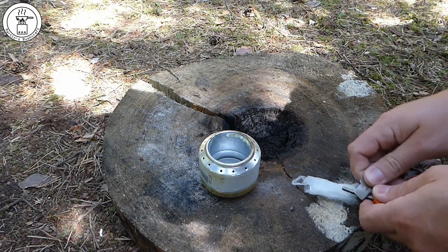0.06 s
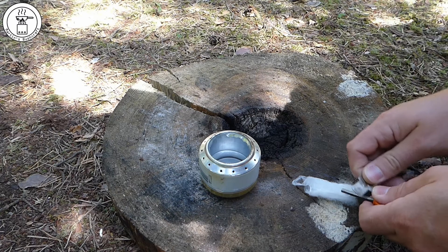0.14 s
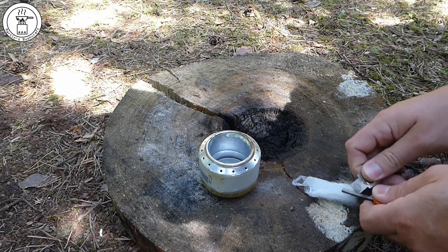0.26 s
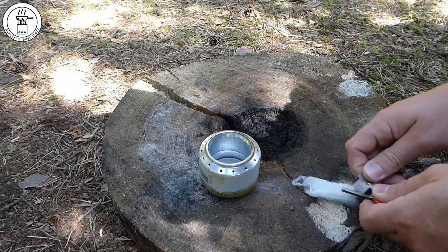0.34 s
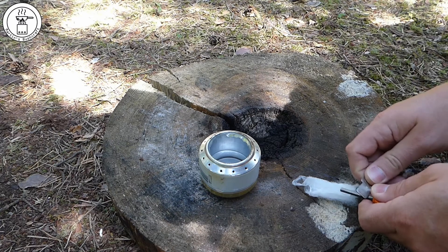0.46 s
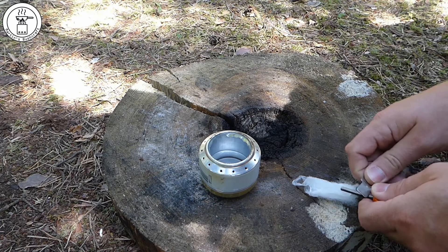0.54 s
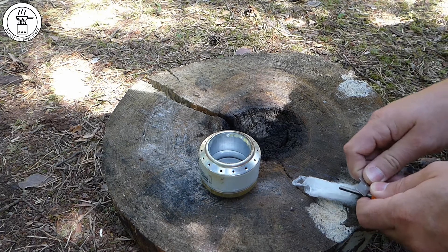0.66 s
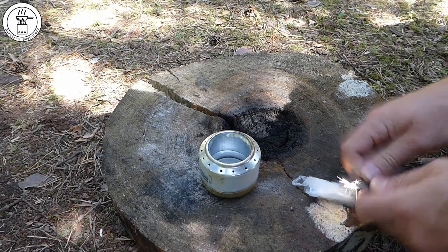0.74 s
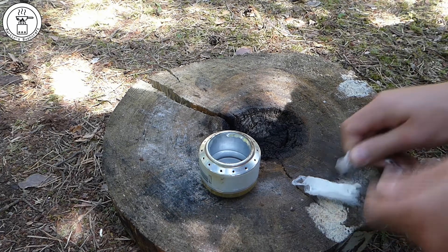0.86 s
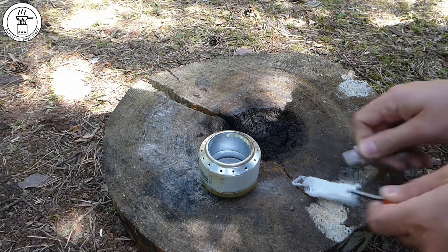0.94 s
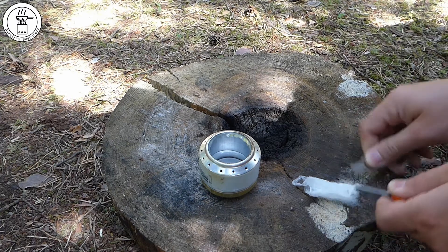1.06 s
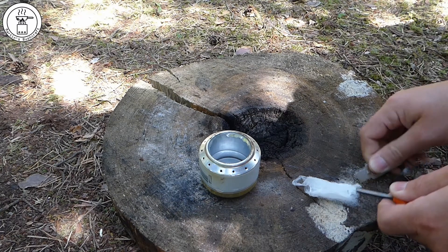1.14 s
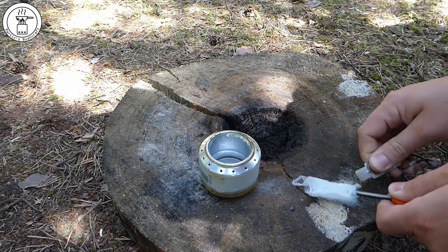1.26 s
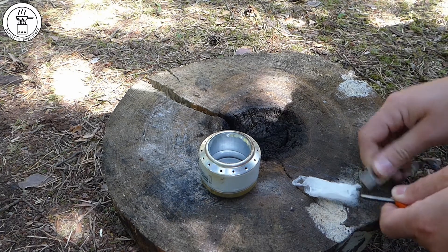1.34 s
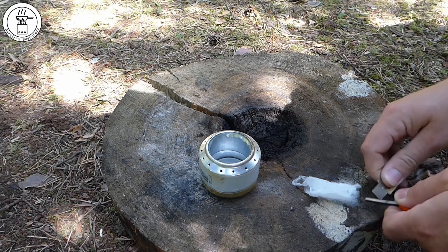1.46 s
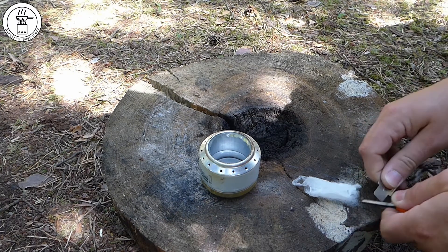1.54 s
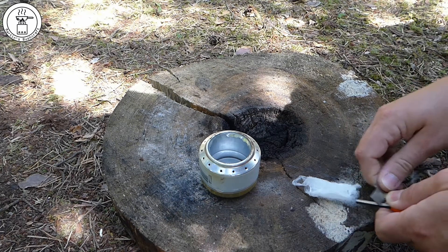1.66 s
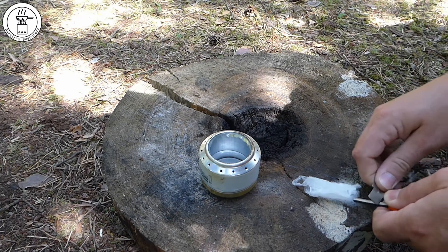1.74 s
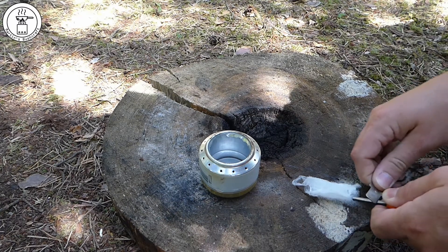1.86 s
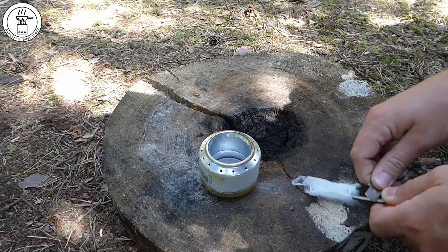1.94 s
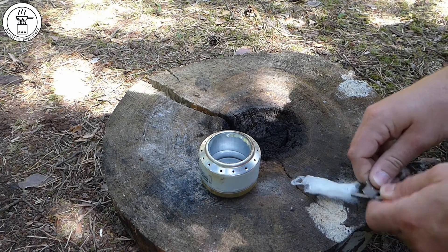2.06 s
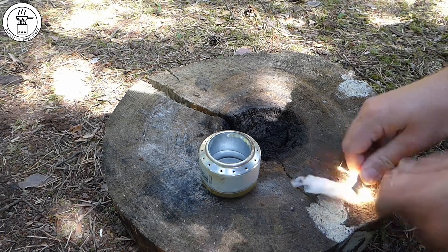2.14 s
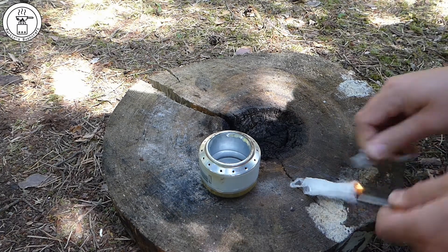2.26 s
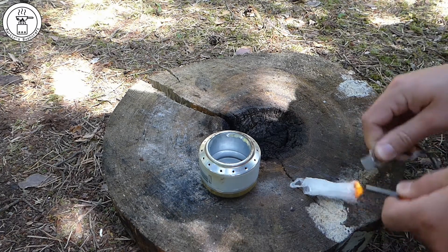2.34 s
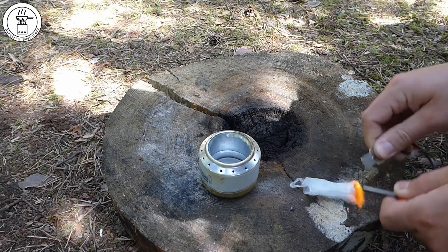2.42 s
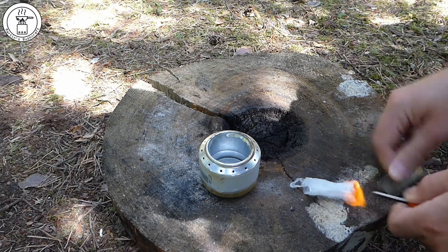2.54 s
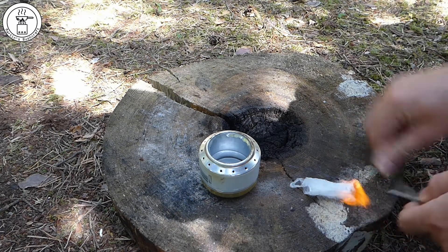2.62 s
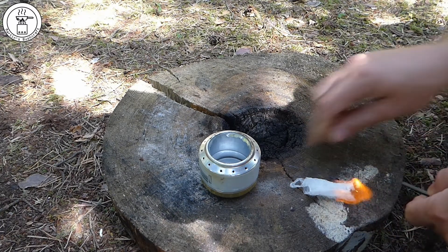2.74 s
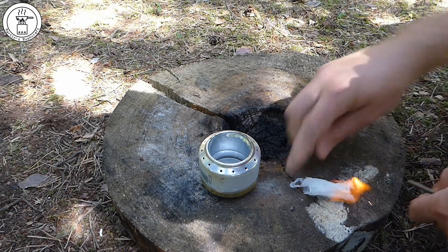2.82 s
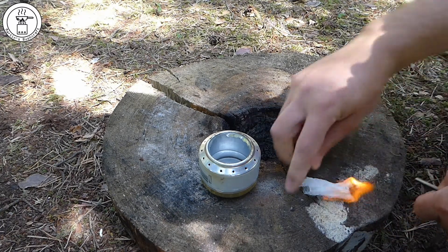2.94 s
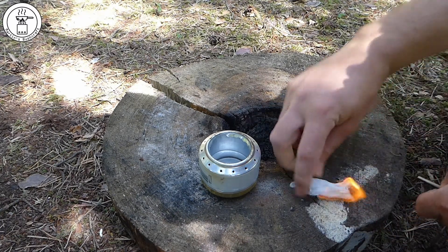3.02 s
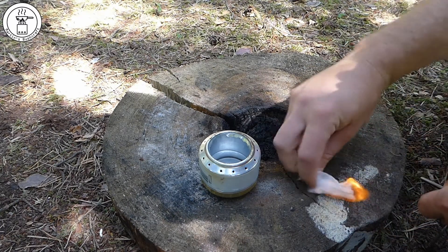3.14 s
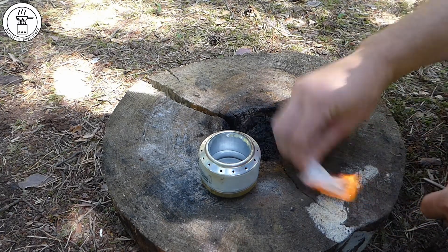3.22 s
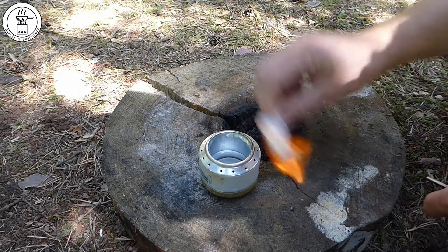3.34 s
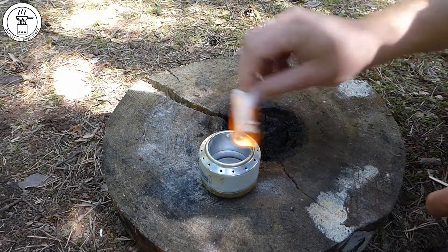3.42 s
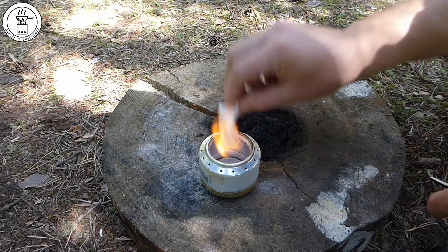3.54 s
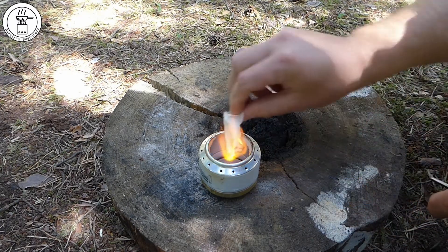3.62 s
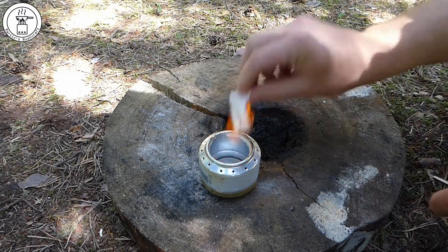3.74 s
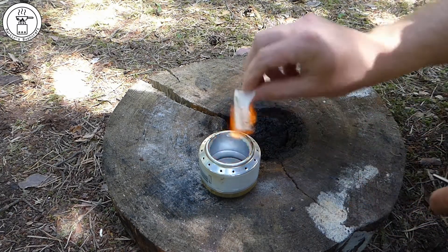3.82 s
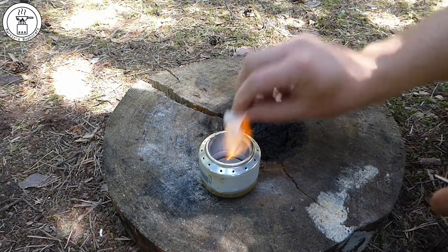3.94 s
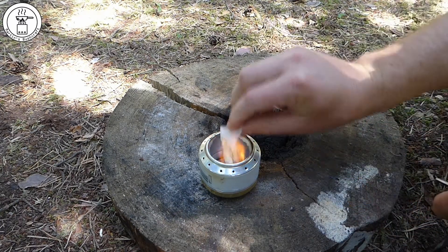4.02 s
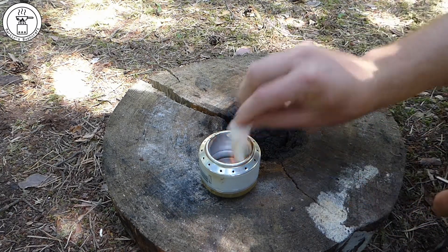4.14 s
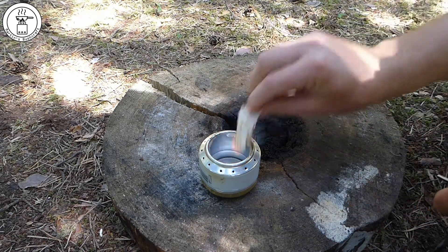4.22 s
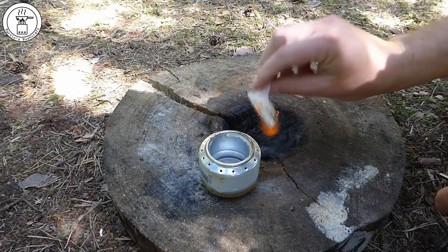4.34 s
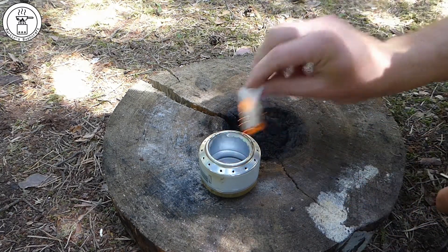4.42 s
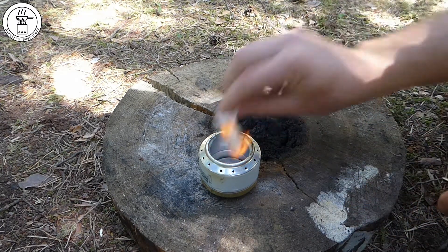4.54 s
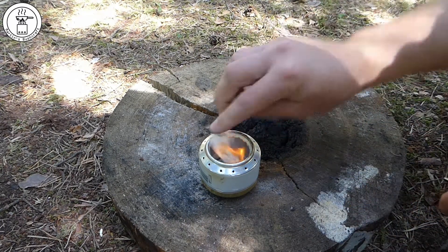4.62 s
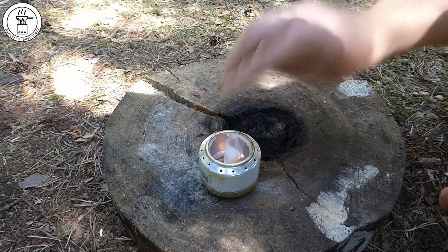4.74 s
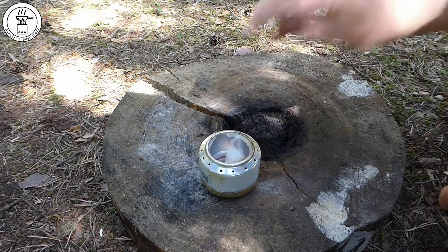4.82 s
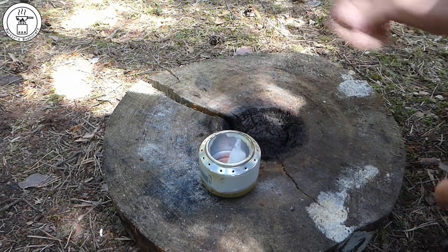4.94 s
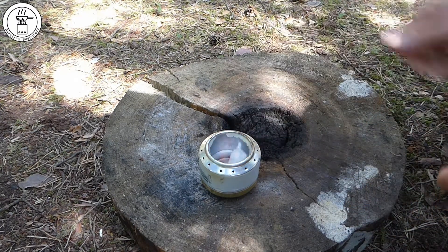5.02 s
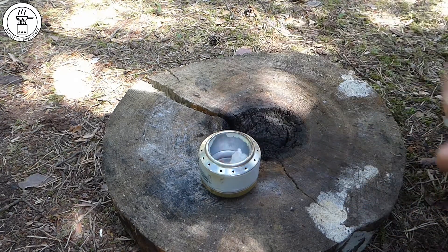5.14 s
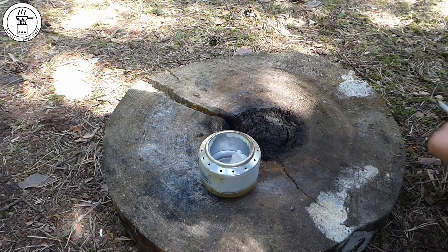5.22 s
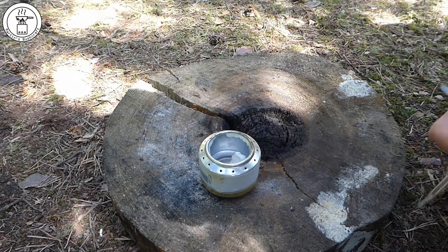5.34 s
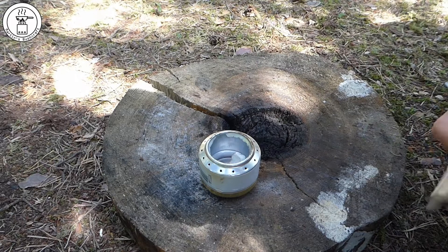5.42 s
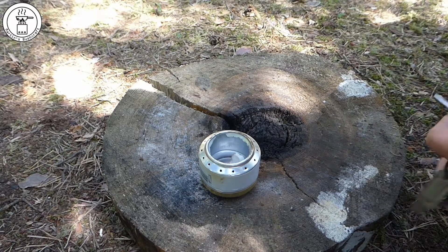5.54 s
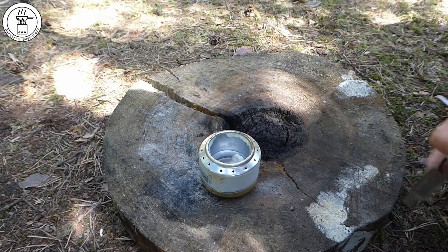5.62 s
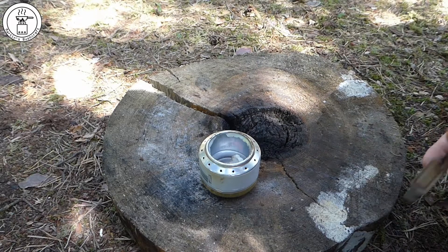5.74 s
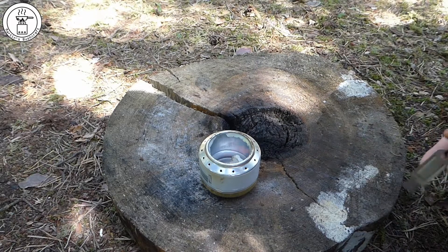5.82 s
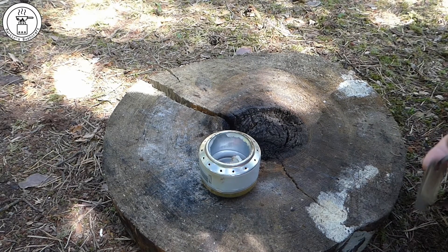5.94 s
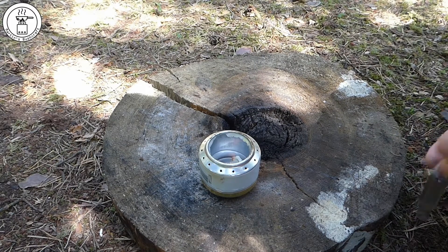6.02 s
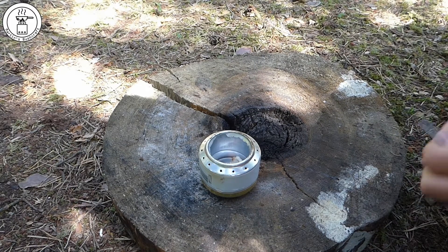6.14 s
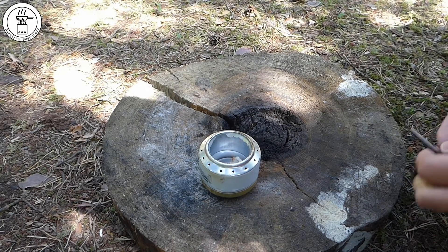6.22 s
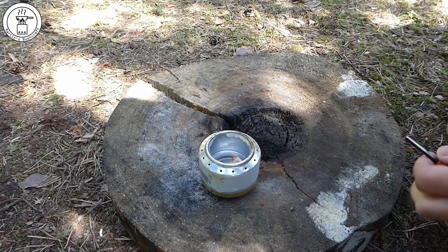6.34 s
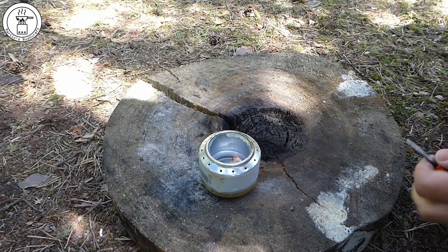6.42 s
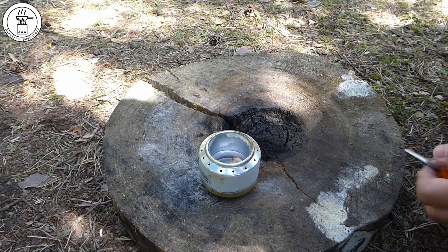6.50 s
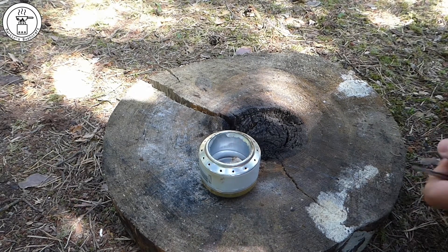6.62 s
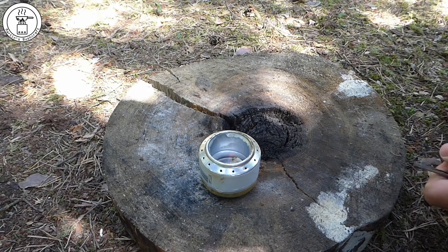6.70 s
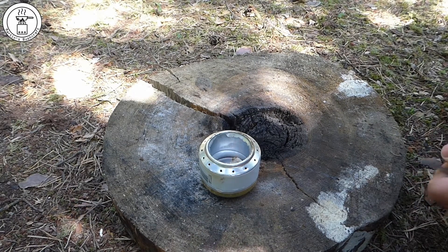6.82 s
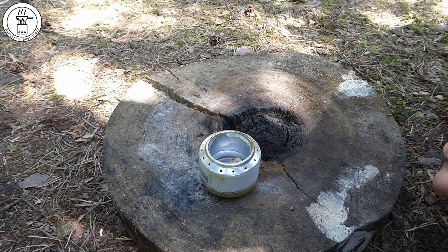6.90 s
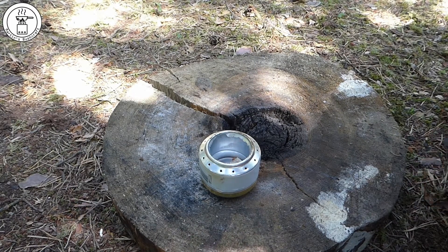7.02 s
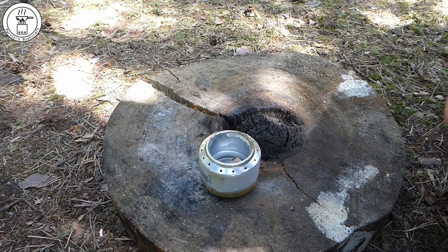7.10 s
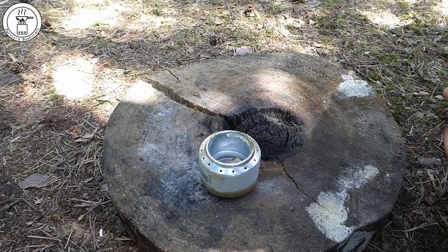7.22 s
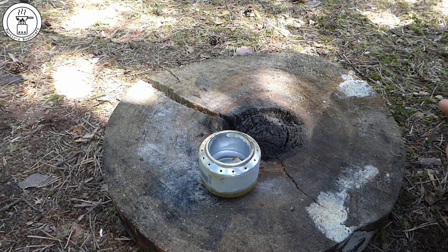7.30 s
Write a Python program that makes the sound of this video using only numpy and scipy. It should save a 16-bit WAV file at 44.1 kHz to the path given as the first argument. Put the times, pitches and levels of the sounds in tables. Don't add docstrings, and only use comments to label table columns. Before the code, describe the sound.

Quiet stereo ambience of far traffic rumble and smooth leaf-like hiss. Near the microphone, two abrupt scratchy metal strikes come over a second apart, the first much the sharper, followed by a dull knock and a brighter ringing chink. Hands rustle softly; then a muffled thump in a can starts a bright boiling hiss with tiny spitting clicks, narrowing and fading. Late on, a fingernail ticks rapidly over ribs, with one faint high bird call.

```python
import sys
import numpy as np
from scipy import signal
from scipy.fft import rfft, irfft, next_fast_len
from scipy.io import wavfile
from scipy.ndimage import map_coordinates

SR = 44100
rng = np.random.default_rng(int(sys.argv[2]) if len(sys.argv) > 2 else 0)


def put_to_file(sound):
    columns = np.atleast_2d(sound).T
    safe = np.clip(columns, -1, 1)
    whole_steps = np.round(safe * 32767)
    wavfile.write(sys.argv[1], SR, whole_steps.astype(np.int16))


def decibels_to_gain(level_db):
    exponent = np.asarray(level_db, float) / 20
    return 10 ** exponent


N = 324742

# bite_s, slip_off_s, lift_s, bite_db, slip_off_db
STROKES = [
    (0.8074, 0.834, .846, -42, -27.5),
    (2.1463, 2.192, 2.2, -42.5, -25),
]
# start_s, ring_db, ring_hz, length_s
SLIPS = [(0.809, -36, 11500, .003), (0.8108, -28, 12410, 0.00253), (0.8299, -23, 11810, 0.00279),
         (.8315, -24, 10400, 0.001862), (.8475, -32, 9903, .002), (.8119, -26, 9300, 0.00299),
         (.8125, -27.5, 2300, .0022), (.8127, -30, 3505, .002), (0.821, -24, 12000, 0.00329),
         (.823, -23, 6398, 0.002754), (.8295, -20.5, 6430, 0.0052), (0.8341, -27.5, 7200, 0.0018),
         (0.8367, -10, 3500, 0.000678), (.8369, -18, 2697, 0.001915), (.837, 0.5367, 9450, 0.0008),
         (.8380, -6, 10350, 0.0014), (.8386, -10.5, 10000, .0008), (.8378, -20, 6200, .002),
         (0.841, -26, 3588, .0045), (2.146, -35, 10100, 0.00396), (2.162, -26, 9800, 0.0038),
         (2.172, -28, 10600, .003), (2.176, -29, 10000, 0.0029), (2.179, -21, 10820, 0.00274),
         (2.1809, -20, 11240, .002), (2.1865, -23, 10300, .002), (2.1995, -31, 11500, 0.0026),
         (2.2005, -29, 3000, 0.002573), (2.1895, -17.5, 2572, 0.0021), (2.1896, -7.5, 12600, 0.0018),
         (2.1897, -12, 6745, 0.0023), (2.1899, -10, 9868, .0018), (2.1955, -31, 6207, 0.002),
         (2.199, -26, 8100, .0024)]
# start_s, ring_db, ring_hz, length_s, jolt_db
TICKS = [(.4798, -38.5, 7220, 0.0019, -4.5), (.4799, -46.5, 4300, .0015, 4), (.4799, -44, 9300, .0015, -3),
         (1.7078, -34.5, 6100, 0.0014, -2.5), (1.7079, -37.5, 4980, 0.0017, -7),
         (1.7079, -38, 3820, 0.0024, -9), (1.7079, -43, 10000, .0015, -3), (2.2326, -38, 3530, 0.006101, 6),
         (2.2459, -39, 11310, .0075, 7.5), (2.3694, -45.5, 2600, 0.000827, 3),
         (2.3697, -40, 4200, 0.001112, 1.5), (2.3697, -41, 10800, 0.00114, 1.5),
         (2.2315, -37, 2300, .004, -6), (2.2475, -36, 2000, 0.00574, -6), (2.2486, -42, 4200, .004, -6),
         (2.627, -42, 1543, 0.0075, -8), (2.6594, -39.5, 2886, 0.003, 1), (2.769, -46, 10680, 0.00824, 1),
         (3.028, -56, 11500, .003, 3.5), (3.059, -60, 10500, 0.00246, 0), (3.149, -55, 6380, 0.006305, 1),
         (3.349, -57, 11500, .003, 3), (6.508, -66, 4600, .02, -15), (6.543, -64.5, 6050, .02, -15),
         (4.7385, -36, 9300, .011, -22.5)]
# centre_hz, width_hz, level_db
STEEL_MODES = [(9300, 810, 1), (10400, 490, 5.5), (11994, 2600, 0), (14200, 1400, -24.5)]
# centre_hz, width_hz, level_db
GRIP_MODES = [(1810, 440, -8), (2470, 440, -3), (3600, 460, -4), (4800, 780, -4.5), (6630, 670, -3.5)]
# centre_hz, width_hz, level_db
STUMP_MODES = [(170, 117, -9.5), (400, 154, -1.5), (801, 360, -3.5)]
# start_s, level_db, dull_knock_db, sharp_snap_db, damped_at_s
CHINKS = [
    (2.629, -39, 7, -15, 2.66),
    (2.6594, -34, -4, 0, 2.768),
]
# pitch_hz, level_db, t60_s, split_hz, beat_start_turns, beat_depth_0_to_1
PLATE_MODES = [(565, 2, 0.018, 9, 0, 0.35), (807, -5, 0.09, 6.6, 0, .3), (1777, -7, 0.085, 3.7, 0.12, 0.3),
               (4414, -13, .7, 14, 0, .65), (8398, -28, .4, 7, .75, .5), (10290, -7.5, .32, 19, .58, .5),
               (12885, 4, .075, 9, 0, .3), (12900, -16, .6, 14, .8, .3), (14520, -25, 0.2, 12, 0.8, .5),
               (15400, -32, .2, 9, .7, .7)]
# start_s, high_mode_db, lower_mode_db, length_s
JINGLES = [(5.06, -62, -76, .05), (5.776, -72, -77, .08), (5.95, -68, -78, .03), (6.027, -71, -69, 0.0552),
           (6.273, -65, -72, 0.11), (6.44, -79.5, -78, .06), (7.108, -73, -70, 0.047)]
# start_s, level_db, final_pitch_hz, t60_s, direction_sign
THUMPS = [(.821, -26, 497, 0.0072, 1), (.8303, -23, 257, 0.045, 1), (.831, -23, 1030, .012, 1),
          (0.837, -23, 147.1, 0.044, -1), (.844, -28, 300, 0.017, 1), (2.19, -29.5, 203.6, 0.05125, -1),
          (2.774, -38, 222, .046, -1), (3.156, -38.5, 398, 0.013, -1), (4.125, -56, 1950, .09, 1),
          (4.263, -37, 700, .012, 1), (4.716, -39, 420, 0.019, -1), (4.7205, -37.5, 300.5, .02, -1),
          (4.7295, -35, 299.7, 0.02, 1), (4.7430, -26.5, 130, .03, -1), (4.7477, -18.5, 130, .05, -1),
          (4.7427, -37, 2000, .008, -1), (4.7472, -31.5, 1924, 0.00796, 1), (4.750, -26, 750, 0.011, 1),
          (6.7932, -32.5, 230, 0.03147, 1)]
# peak_s, level_db, rise_10db_s, fall_10db_s
FLARES = [(4.742, -43.5, 0.0124, 0.1866), (4.865, -48, 0.05, 0.0456), (5.065, -49.5, 0.06, 0.0816),
          (5.12, -59.5, -0.02, 0.0589), (5.33, -60.5, 0.2, 0.233), (4.91, -57, 0.0178, .05),
          (4.97, -52.5, 0.0164, .08), (5.215, -54.5, 0.0485, 0.0834), (5.4, -58, 0.009, 0.0575),
          (4.727, -54, -0.0074, 0.06), (4.805, -49, 0.02, .05), (5.93, -71, 0.5, -0.299),
          (6.04, -69.5, .1, .12), (6.28, -69, 0, .08)]
# peak_s, level_db, rise_10db_s, fall_10db_s
LAST_LICK = (6, -64.5, -0.36, 0)
# freq_hz, level_db_per_hz
JET_COLOUR = [(710, -41), (1200, -6.5), (1790, -1.5), (1970, 0.5), (2150, 0.5), (3520, -5), (4180, -7.5),
              (4970, -13.5), (6710, -1), (8320, -7), (11700, -0.5), (13200, -9.5), (14700, -24),
              (15700, -36)]
# centre_hz, width_hz, level_db
CALM_JET_MODES = [(10100, 1373, 4), (12000, 2000, -8.5)]
# centre_hz, width_hz, level_db
CUP_MODES = [(2300, 354.8, 1.3), (3600, 2495, -1.5)]
# centre_hz, width_hz, level_db
CALM_CUP_MODES = [(2260, 320, 1), (3730, 970, -10.5)]
# start_s, peak_db, cup_db
SPITS = [(5.2914, -44.5, 0), (5.5508, -51, -15), (5.5792, -54, -11), (5.6226, -47.5, -9),
         (5.6421, -43.5, -8), (5.6533, -44, -6), (5.666, -54, 4), (5.684, -52, 0), (5.7104, -55, -8),
         (5.7485, -52, 0), (5.7715, -59, -2), (5.8589, -53, 4.5), (5.864, -57, 6), (5.9206, -49, -3),
         (6.0556, -58, -6), (6.2462, -51, -4)]
# centre_hz, width_hz, level_db
DROP_RIM_MODES = [(6550, 900, 0)]
# centre_hz, width_hz, level_db
DROP_CUP_MODES = [(2250, 400, 2), (3293, 1000, -6)]
# peak_s, sleeve_db, rise_10db_s, fall_10db_s, skin_db
RUSTLE = [(.918, -63.5, -0.7, 0.1457, -2.5), (1.07, -65, 0, 0.0863, -12), (2.26, -60.5, 0.0491, 0.15, 2),
          (2.37, -70, 0.1694, 0, 3.5), (2.56, -64, 0.36, -0.1, -2.5), (2.63, -65, 0.1168, 0.2316, 6),
          (2.73, -59, 0.14, 0, -7), (2.812, -57.5, 0.08, 0.0649, 3), (3.04, -65, 0.5, 0.152, -9),
          (3.2, -73.5, 0.2, -0.2, 7), (3.36, -60, 0.03, 0.06, -7), (3.385, -64, 0.17, .03, -5),
          (3.28, -67, .03, 0.1951, -3), (3.524, -65, 0.44, 0.079, 1), (3.594, -70, 0, -0.15, 3),
          (4.124, -74, 0.1954, 3, 0), (4.198, -78, .02, 2, -9), (4.4, -71.5, -0.8, 1, 1),
          (6.412, -77.5, 0.7, -1.6316, -2), (6.632, -71.5, 0.1013, 0.4428, -1), (6.78, -76, 0.4866, .07, 5),
          (7.084, -72, -0.0152, 5.3928, -5), (7.22, -74, 0.5, 0.545, 2), (7.36, -58, 0.07, .1, 1.5)]
# freq_hz, level_db
SLEEVE_COLOUR = [(4500, -28), (6500, 2), (8000, -5.5), (10500, 2), (13000, -7.5), (15500, -31)]
# freq_hz, level_db
SKIN_COLOUR = [(1000, -16), (2000, -4), (3600, -5), (4800, -5.5), (6000, -22)]
# time_s, level_db, centre_hz, width_hz
SLIDE = [(3.0, -90, 3900, 500), (3.1, -71, 3730, 499.4), (3.25, -69, 3518, 600.4), (3.325, -67, 3642, 600),
         (3.333, -66, 4170, 500), (3.36, -66.5, 4101, 500), (3.4, -85, 3900, 600)]
# start_s, peak_db
CATCHES = [
    (6.5857, -46.5),
    (6.5964, -52),
    (6.6254, -47),
]
RIB_DB = [-40, -45, -47, -43, -42.5, -46, -42, -42.5, -46, -42]
# centre_hz, width_hz, level_db
NAIL_MODES = [(2200, 630, -1), (3067.6, 700, 0.5), (4300, 900, -11), (5960, 464.6, -1)]
# time_s, pitch_hz, level_db
BIRD = [(6.58, 8572, -82), (6.594, 8655, -76), (6.666, 9191, -74), (6.725, 9420, -73), (6.735, 9500, -80),
        (6.748, 9750, -72), (6.775, 9600, -72), (6.798, 8900, -73), (6.81, 8100, -88)]
# freq_hz, level_db_per_hz
FAR_COLOUR = [(15, -72.5), (25, -42), (59, -28), (71, -14), (96, -4.5), (192, -0.5), (301, -7.5), (338, -4),
              (489, -7.5), (779, -5.5), (984, -9), (1200, -11.5), (2600, -32), (3380, -60.5), (5720, -120)]
# freq_hz, likeness_0_to_1
FAR_ALIKE = [(30, 0.34), (80, 1), (250, 0.94), (600, 0.68), (1200, 0.074), (2500, 0.057)]
# time_s, level_db
SWELL = [(0, 0), (1.17, -1), (1.43, 0.5), (2.52, 1.0932), (2.95, -1), (3.22, 1.5), (4.47, -0.5), (4.9, 0.5),
         (5.74, -2), (5.94, -1), (7.36, -0.2)]
# freq_hz, level_db_per_hz
HISS_COLOUR = [(880, -29), (1500, -9), (2040, -7.5), (2580, -10), (3270, -5.5), (4140, -7), (4610, -7),
               (5730, -12.5), (6260, -9), (7690, -13), (11300, -10.5), (13500, -17), (15200, -23),
               (15800, -27)]
# freq_hz, level_db
MIC_RESPONSE = [(20, -42.5), (50, -18), (90, -10.5), (150, -3.5), (13000, -0.5), (15500, -5),
                (16000, -61.5)]
# freq_hz, level_db_per_hz
RUMBLE_COLOUR = [(10, -2), (45, -1), (70, -12), (200, -50)]


def unit(x):
    return x / np.sqrt(np.mean(x ** 2) + 1e-20)


def along(points, hz):
    f, v = np.transpose(points)
    return np.interp(np.log(hz + 1), np.log(f + 1), v)


def curves(rows, silent=-140):
    s, first, *others = np.transpose(rows)
    t = np.arange(N) / SR
    return [np.interp(t, s, first, silent, silent)] + [np.interp(t, s, column) for column in others]


def swells(rows, extra_db=0):
    s, db, rise, fall = np.transpose(rows)[:4, :, None]
    t = np.arange(0, N, 16) / SR - s
    drop_db = 10 * np.where(t < 0, -t / np.abs(rise), t / np.abs(fall))
    each = decibels_to_gain(db + extra_db - drop_db)
    return np.repeat(np.linalg.norm(each, axis=0), 16)[:N]


def wobble(rate):
    knots = rng.standard_normal(int(N * rate / SR) + 4)
    return map_coordinates(knots, [np.arange(N) * rate / SR])


def filtered(x, response):
    m = next_fast_len(N + 8192)
    return irfft(rfft(x, m) * response(np.fft.rfftfreq(m, 1 / SR)), m)[..., :N]


def body(modes):
    def response(f):
        h = 0
        for k, (centre, width, db) in enumerate(modes):
            damping = 1j * f * width
            h = h + (-1) ** k * decibels_to_gain(db) * damping / (centre * centre - f * f + damping + 1e-9)
        return unit(np.abs(h)) * np.exp(1j * np.angle(h))
    return response


def colour(points):
    return lambda f: unit(decibels_to_gain(along(points, f)))


def grit(clump_db, rate):
    return unit(rng.standard_normal(N) * decibels_to_gain(clump_db * wobble(rate)))


def whistle(hz, width):
    steps = np.cumsum(width) / SR + 1
    knots = rng.standard_normal((2, int(steps[-1]) + 4))
    sway = map_coordinates(knots[0], [steps]) + 1j * map_coordinates(knots[1], [steps])
    return unit(np.real(sway * np.exp(2j * np.pi * np.cumsum(hz) / SR)))


def placed(x, pan_db, loose):
    echo = np.array([np.roll(x, 31), -np.roll(x, 47)])
    return (x + loose * echo) * decibels_to_gain([[pan_db / 2], [-pan_db / 2]])


def spread(spectrum, alike):
    def response(hz):
        turn = np.arccos(np.clip(along(alike, hz), -1, 1)) / 2
        return decibels_to_gain(along(spectrum, hz)) * [np.cos(turn), np.sin(turn)]
    mid, side = filtered(rng.standard_normal((2, N)), response)
    return unit(np.array([mid + side, mid - side]))


def pressure():
    touch_s, dust_s = 0.0054, 0.04
    rows = []
    for bite, slip, lift, bite_db, slip_db in STROKES:
        rows += [
            (bite - touch_s - .005, -140, 0),
            (bite - touch_s, bite_db - 17.5, 0),
            (bite, bite_db, .5),
            (slip, slip_db, 1),
            (lift, slip_db - 6, .5),
            (lift + 0.0076, slip_db - 26, 0),
            (lift + dust_s, slip_db - 36, 0),
            (lift + dust_s + .005, -140, 0)]
    return curves(rows)


def scraper():
    edge_db, dig = pressure()
    grip_db = edge_db + np.interp(dig, [0, 1], [-1, -5.5])
    stump_db = edge_db + np.interp(dig, [0, 1], [-2.5, -9.5])
    drive = decibels_to_gain([edge_db, grip_db, stump_db]) * [grit(3, 700), grit(3, 500), grit(3, 200)]
    ring = np.zeros(N)
    t = np.arange(SR // 40) / SR
    slips = [(*row, -14 - 0.25 * row[1]) for row in SLIPS]
    for s, db, hz, length, jolt_db in slips + TICKS:
        at = round(s * SR)
        shape = decibels_to_gain(db) * np.minimum(t / (.3 * length), 1) * np.exp(-(t / length) ** 2 * 2.2)
        chance = rng.standard_normal((3, len(t)))
        drive[:2, at:][:, :len(t)] += shape * chance[:2] * decibels_to_gain(jolt_db - 4)
        ring[at:][:len(t)] += shape * np.sin(2 * np.pi * hz * t + .15 * np.cumsum(chance[2]))
    steel = ring + filtered(drive[0], body(STEEL_MODES)) + filtered(drive[1], body(GRIP_MODES))
    steel = filtered(steel, lambda f: 1 / np.sqrt(1 + (f / 13300) ** 24))
    stump = filtered(drive[2], body(STUMP_MODES))
    return placed(steel, pan_db=-7.0, loose=0.065) + placed(stump, pan_db=-2.5, loose=0.07)


def chinks():
    out = np.zeros(N + SR)
    t = np.arange(SR // 2) / SR
    for s, db, knock_db, snap_db, stop in CHINKS:
        ring = decibels_to_gain(snap_db / 2 - 2 - 60 * t / .006) * rng.standard_normal(len(t))
        for hz, level, t60, split, start, depth in PLATE_MODES:
            beat = 1 + depth * np.cos(2 * np.pi * (split * t + start))
            blow_db = knock_db if hz < 1200 else snap_db * (t60 < .16)
            ring += decibels_to_gain(level + blow_db - 60 * t / t60) * beat * np.sin(2 * np.pi * hz * t)
        damped = decibels_to_gain(db - 60 * np.maximum(t + s - stop, 0) / .02)
        out[round(s * SR):][:len(t)] += damped * np.minimum(t / .0008, 1) * ring
    high = np.sin(2 * np.pi * PLATE_MODES[6][0] * t)
    lower = np.sin(2 * np.pi * PLATE_MODES[4][0] * t)
    for s, high_db, lower_db, length in JINGLES:
        swell = t / length * np.exp(1 - (2.202 * t / length) ** 1.6) * 2
        out[round(s * SR):][:len(t)] += swell * (decibels_to_gain(high_db) * high + decibels_to_gain(lower_db) * lower)
    return placed(out[:N], pan_db=-5.0, loose=0.0226)


def thumps():
    out = np.zeros(N + SR)
    t = np.arange(SR // 8) / SR
    for s, db, hz, t60, way in THUMPS:
        early_turns = 150 / hz * decibels_to_gain((db + 18.5) / 3)
        phase = 2 * np.pi * (hz * t + early_turns * (1 - np.exp(-t / .0022)))
        pointed = np.exp(-t / .004) * (.07 * np.sin(5 * phase) - .24 * np.sin(3 * phase))
        push = decibels_to_gain(db - 60 * t / t60) * (np.sin(phase) + pointed)
        out[round(s * SR):][:len(t)] += np.sign(way) * push
    return placed(out[:N], pan_db=1.0, loose=0.0086)


def spits():
    rim, floor = np.zeros((2, N))
    for s, db, cup_db in SPITS:
        rim[round(s * SR)] = decibels_to_gain(db + 12)
        floor[round(s * SR)] = decibels_to_gain(db + cup_db + 14.5)
    rim = filtered(rim, lambda f: body(DROP_RIM_MODES)(f) ** 2 / 4)
    return rim + filtered(floor, body(DROP_CUP_MODES))


def flame():
    time = np.arange(N) / SR
    calm = np.interp(time, [5.12, 5.75], [0, 1])

    def mix(wild, still):
        return wild + (still - wild) * calm ** 1.6

    def blend(wild, still, share):
        wild_part = np.sqrt(1 - share) * filtered(grit(1.3, 60), wild)
        return wild_part + np.sqrt(share) * filtered(grit(2.351, 90), still)

    flare = swells(FLARES)
    licks = swells(FLARES[2:4] + [LAST_LICK])
    growing_db = 43 * np.maximum(5.2 - time, 0)
    dying_db = 26 * np.maximum(time - 5.53, 0)
    simmer = decibels_to_gain(-58 - dying_db - growing_db)

    jet_level = np.hypot(flare, decibels_to_gain(-9.5) * simmer)
    jet = jet_level * blend(colour(JET_COLOUR), body(CALM_JET_MODES), 0.19 + .8 * calm)

    rim_level = np.hypot(decibels_to_gain(mix(-15, -8)) * flare, decibels_to_gain(mix(-3, -6.5)) * simmer)
    rim_flutter = decibels_to_gain((2.2 + 1.8 * calm) * wobble(130))
    rim = rim_level * rim_flutter * whistle(hz=mix(6861.1, 6360), width=mix(1450, 800))

    hollow_db = 0.3 - 150 * np.maximum(time - 5.69, 0)
    cup_level = np.linalg.norm([decibels_to_gain(mix(-13, 1.5)) * flare, licks, decibels_to_gain(hollow_db) * simmer], axis=0)
    cup_share = np.clip(0.24 + 0.7 * np.sqrt(calm), 0, 0.9)
    cup = cup_level * decibels_to_gain(0.639 * wobble(15)) * blend(body(CUP_MODES), body(CALM_CUP_MODES), cup_share)

    hiss = filtered(jet + rim + cup + spits(), lambda f: 1 / np.sqrt(1 + (f / 14700) ** 12))
    return placed(hiss, pan_db=-5.5, loose=0.04845)


def hands():
    sleeve = swells(RUSTLE) * filtered(grit(1.7, 60), colour(SLEEVE_COLOUR))
    skin_db = np.transpose(RUSTLE)[4, :, None]
    skin = swells(RUSTLE, skin_db) * filtered(grit(1.7, 40), colour(SKIN_COLOUR))
    slide_db, hz, width = curves(SLIDE)
    slide = decibels_to_gain(slide_db - 1.5 + 3 * wobble(50)) * whistle(hz, width)
    ribs = [(6.6478 + k * .0128 + k * k * .00011, db) for k, db in enumerate(RIB_DB)]
    ticks = np.zeros(N)
    for s, db in CATCHES + ribs:
        ticks[round(s * SR)] = decibels_to_gain(db + 5)
    nail = filtered(ticks, body(NAIL_MODES))
    return placed(sleeve + skin + slide + nail, pan_db=-8.5, loose=0.069)


def bird():
    s, hz, db = np.transpose(BIRD)
    t = np.arange(N) / SR
    pitch = np.interp(t, s, hz) + 25 * wobble(60)
    level_db = np.interp(t, s, db, -140, -140) + 4 + 1.3 * wobble(60)
    return placed(decibels_to_gain(level_db) * np.sin(2 * np.pi * np.cumsum(pitch) / SR), pan_db=-2.0, loose=.2)


def air():
    swell_db, = curves(SWELL, silent=None)
    far = spread(FAR_COLOUR, FAR_ALIKE)
    low = filtered(far, lambda f: 1 / (1 + (f / 400) ** 4))
    low_level = decibels_to_gain(-53 + swell_db + 0.63 * wobble(4.5))
    high_level = decibels_to_gain(-51.5 + .1 * swell_db + 0.31 * wobble(1.6))
    hiss = spread(HISS_COLOUR, [(2000, 0.067), (5000, 0.22), (12000, 0.31)])
    return low_level * low + high_level * (far - low) + decibels_to_gain(-63.5 + 0.32 * wobble(4.97)) * hiss


def scene():
    near = scraper() + chinks() + thumps() + flame() + hands()
    near = filtered(near, lambda f: decibels_to_gain(along(MIC_RESPONSE, f)))
    rumble = decibels_to_gain(-85.5) * spread(RUMBLE_COLOUR, [(30, .1)])
    return near + bird() + air() + rumble


def roll_off(x):
    return signal.sosfilt(signal.butter(12, 15940, fs=SR, output="sos"), x)


def record(dry):
    limited = np.clip(dry, -0.97, 0.97)
    mix = filtered(limited, lambda f: f < 15660)
    return roll_off(mix)


dry = scene()
out = record(dry)
put_to_file(out)
```